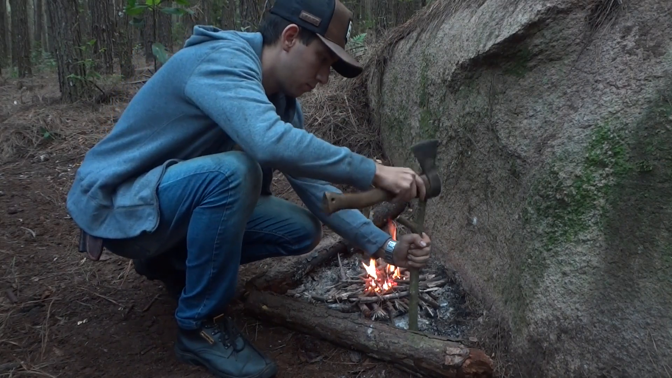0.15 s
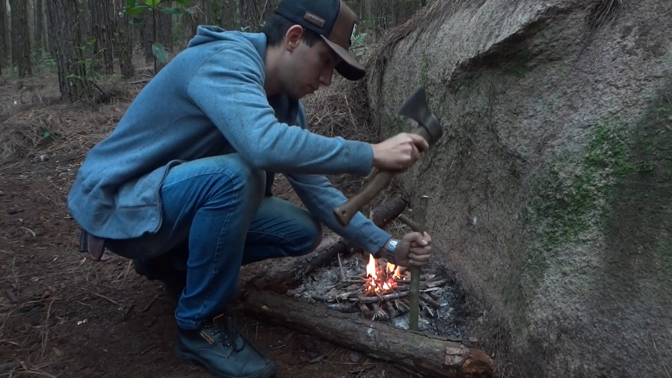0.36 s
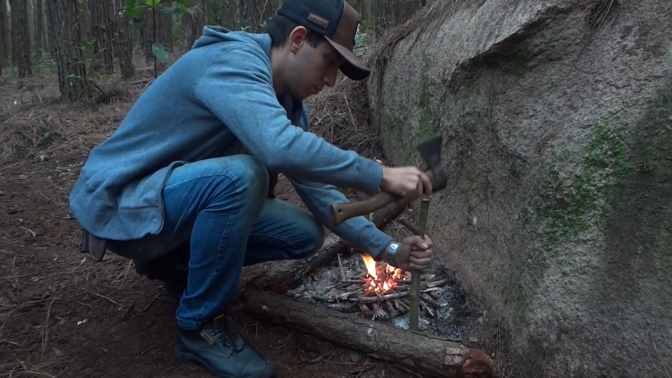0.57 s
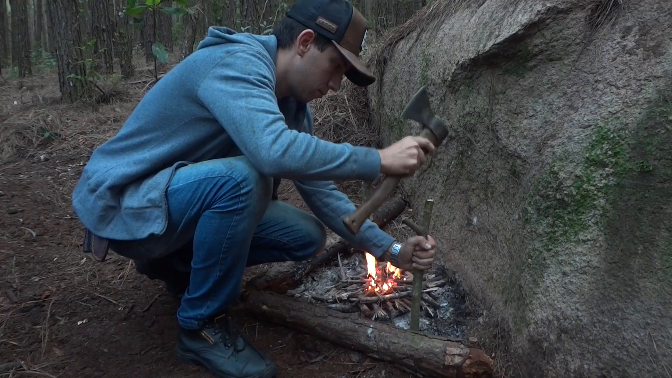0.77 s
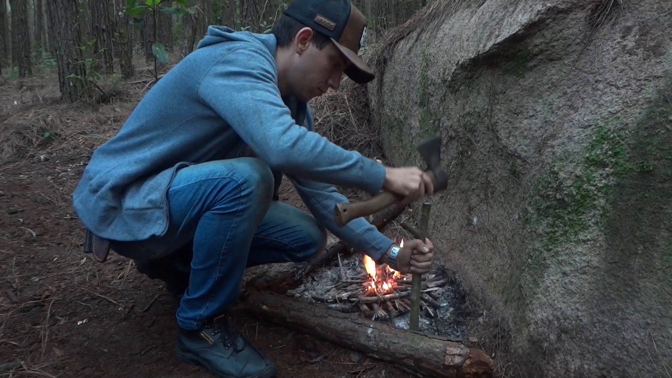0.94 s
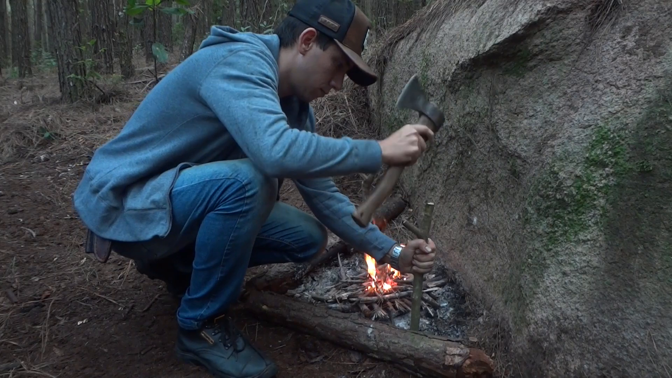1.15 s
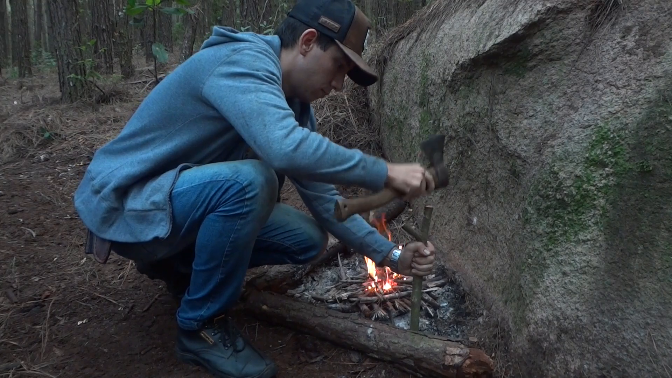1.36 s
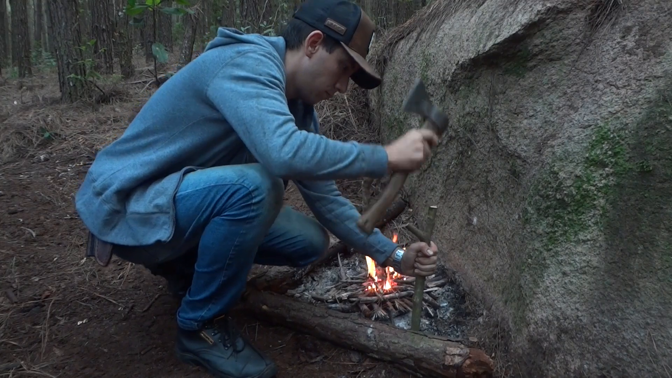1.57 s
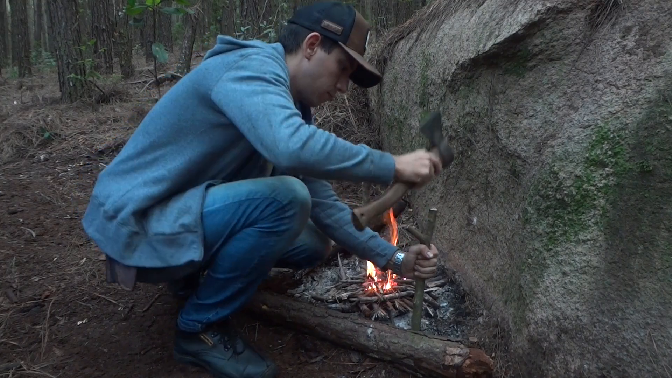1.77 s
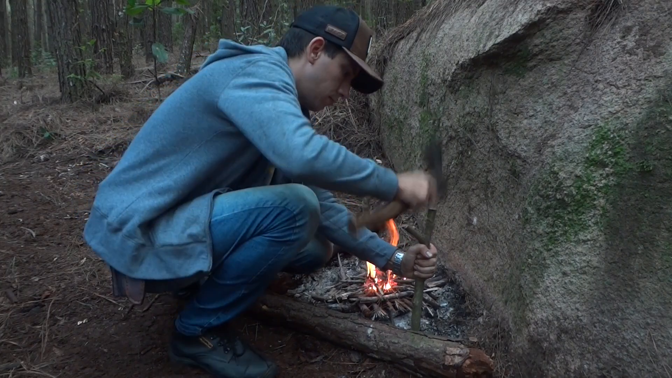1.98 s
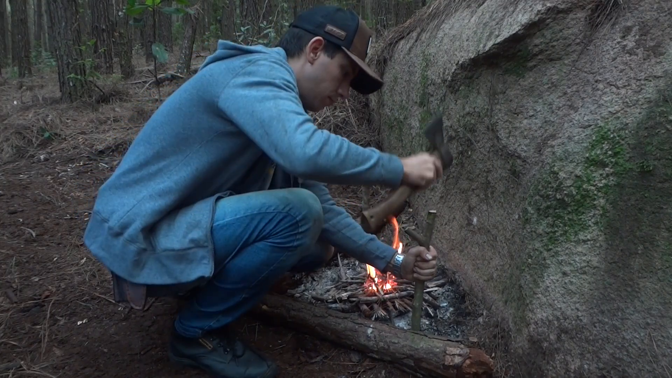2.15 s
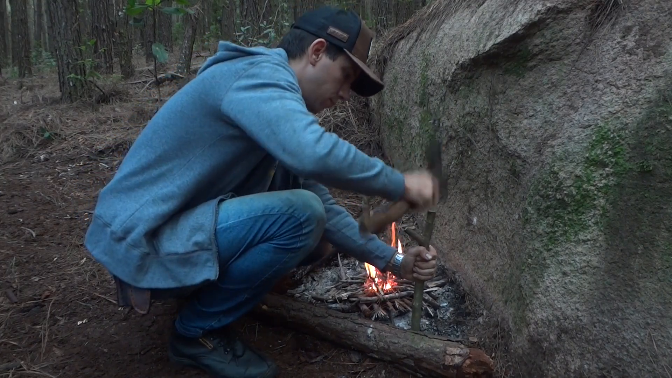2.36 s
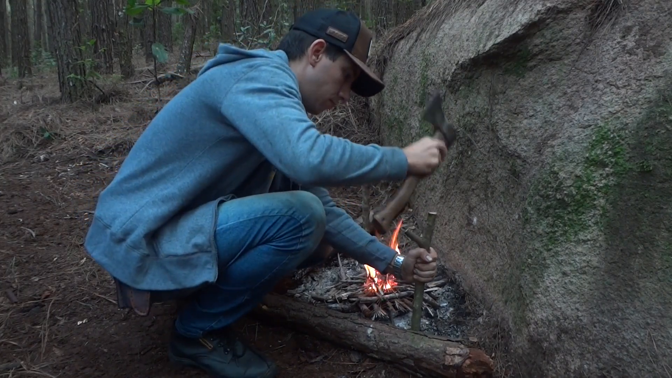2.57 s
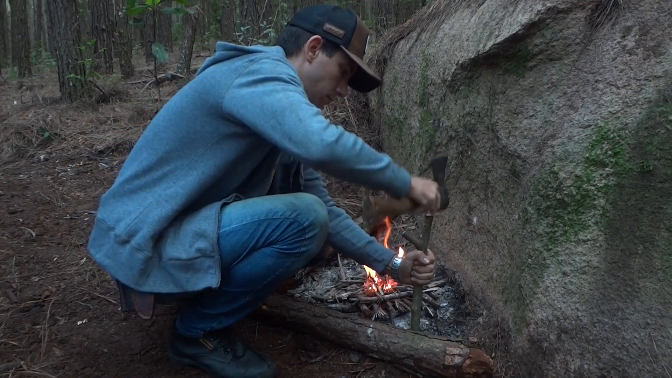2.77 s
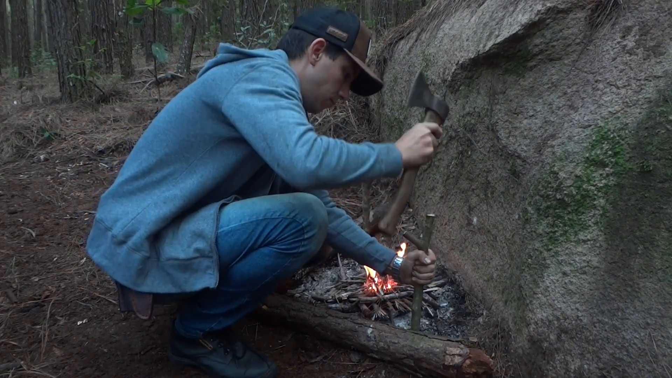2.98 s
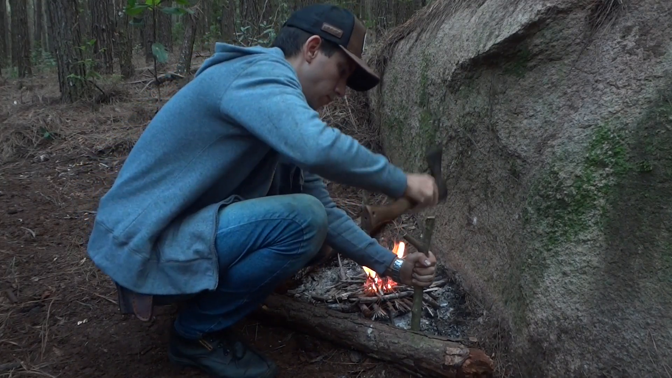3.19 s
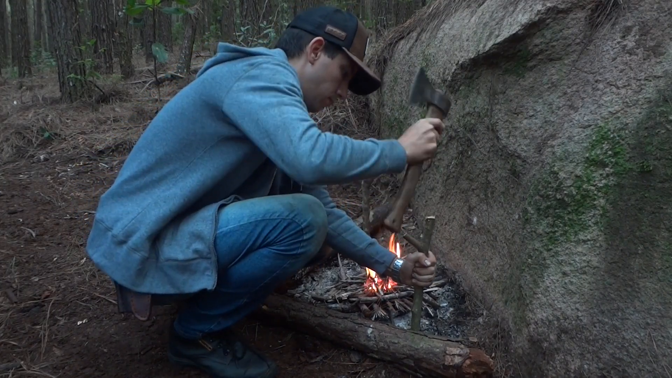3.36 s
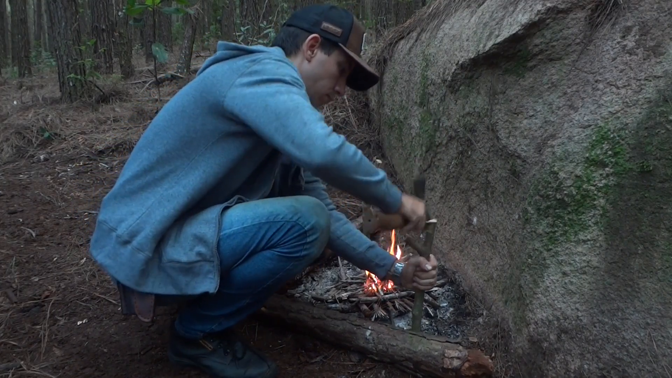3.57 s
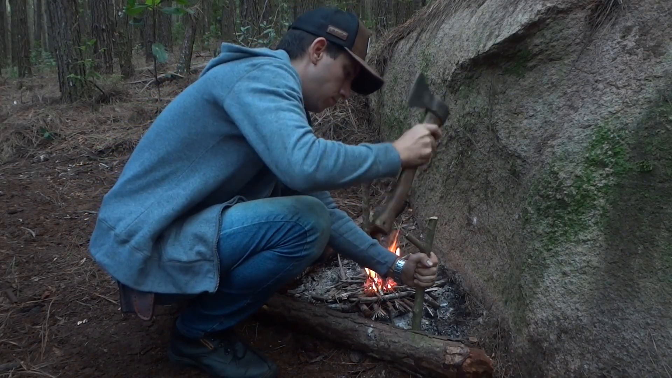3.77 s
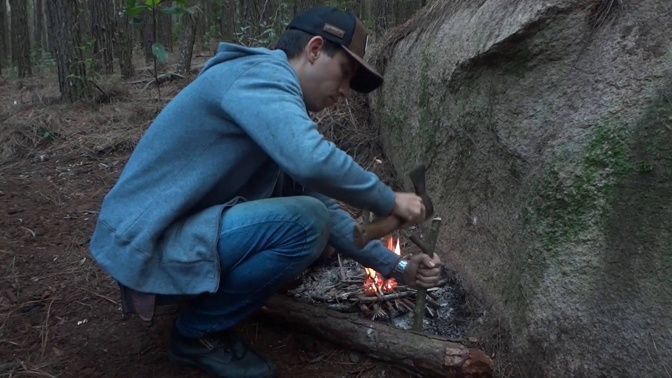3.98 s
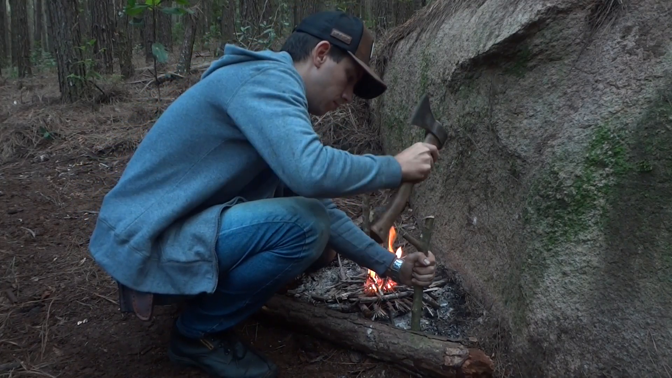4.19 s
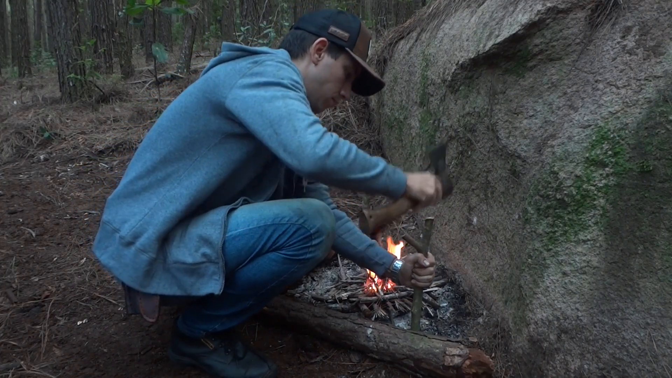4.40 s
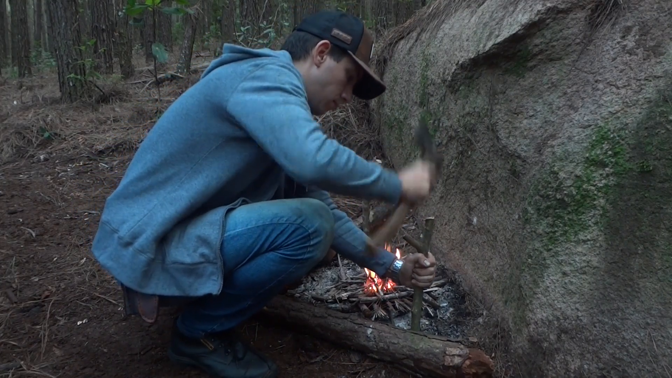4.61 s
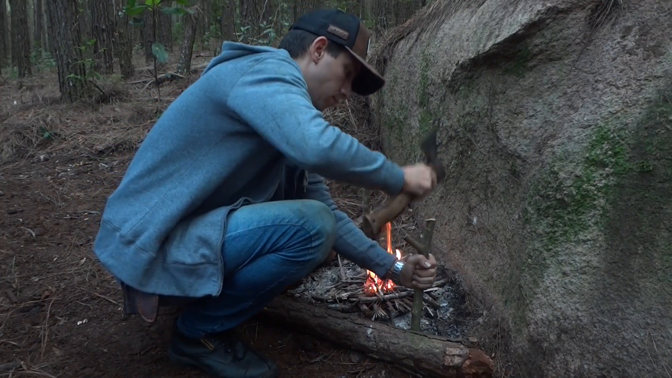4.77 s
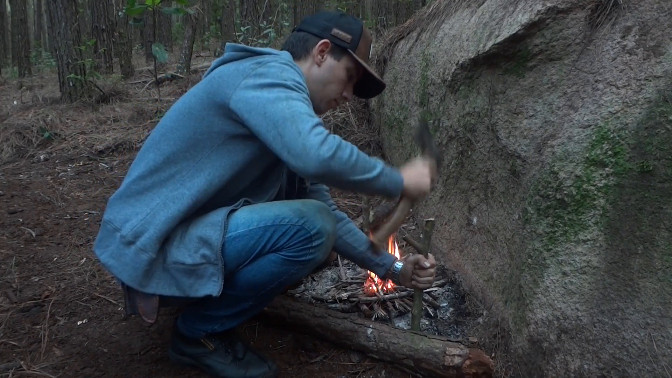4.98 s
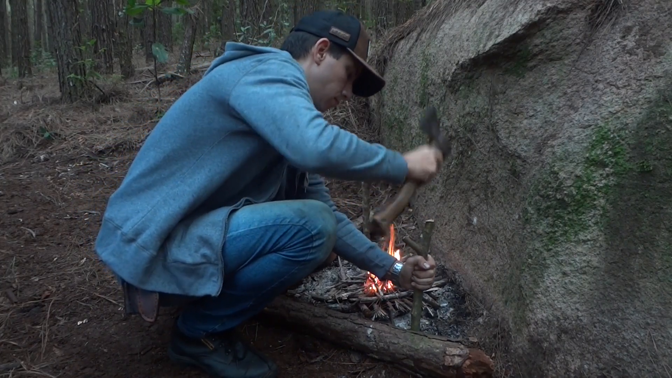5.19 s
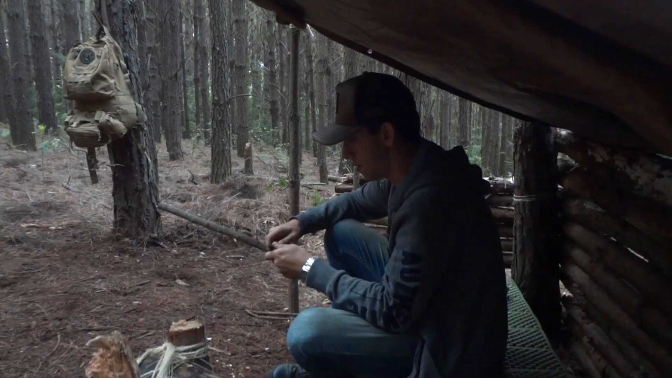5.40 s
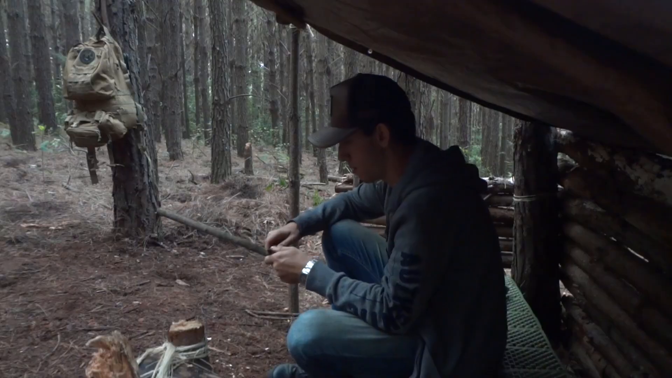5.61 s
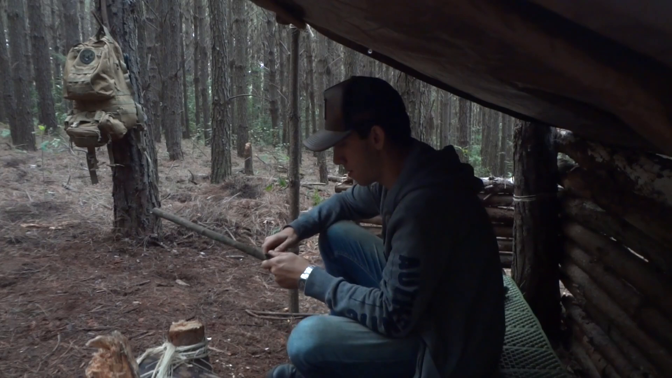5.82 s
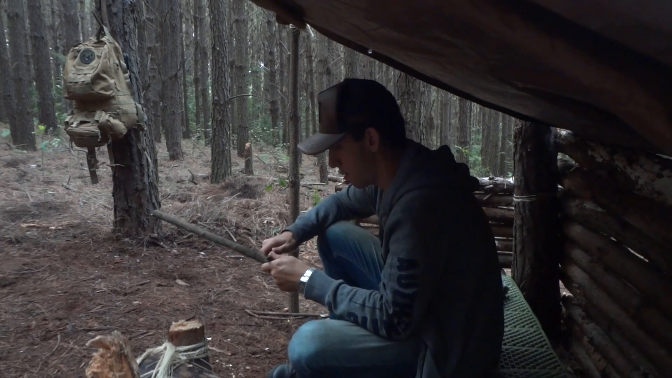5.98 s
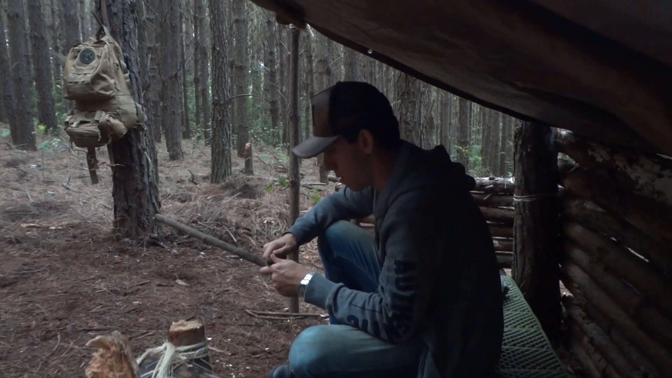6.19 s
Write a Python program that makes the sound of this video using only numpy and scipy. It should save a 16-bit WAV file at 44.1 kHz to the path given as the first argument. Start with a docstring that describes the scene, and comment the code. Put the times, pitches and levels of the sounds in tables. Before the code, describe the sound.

A soft, wide hush of still woods and faint, shrill insects far off run throughout. A small campfire pops quietly at the start. At about 0.2 seconds a hatchet begins driving a wooden stake, close to the stereo microphone and just right of centre. Fourteen blows land evenly, a little under three a second. Each is a woody knock with a short ring of wood and steel and a small grind of grit, echoed briefly by the trunks. Some are dull, others crack sharply. Faint fire pops fall between 1 and 2 seconds. From about 2.4 seconds the blows are louder, with a low ground thump that has grown as the stake seats itself. At 3.5 seconds one blow glances and lands twice with a stony scrape. The last comes near 5.1 seconds. The fire pops again at 5.4, and the insects swell slightly near 5.9.

```python
"""A camp in still woods, the stereo microphone close to a wooden stake, faint insects far off.
A small fire pops, then a hatchet starts on the stake: fourteen quick blows, each a knock, a short ring
and a grind of grit, scattered back by the trunks. Square blows crack and carry further than soft ones.
A thump from the ground grows as the stake seats itself; at 3.5 s one blow glances and lands twice.
After the last blow, near 5 s, the fire pops once more and the insects swell briefly."""
import sys
import numpy as np
from scipy import signal
from scipy.fft import rfft, irfft
from scipy.io import wavfile
from scipy.ndimage import uniform_filter1d, minimum_filter1d

SR = 44100
rng = np.random.default_rng(int(sys.argv[2]) if len(sys.argv) > 2 else 0)


def persist_wave(psi):
    """Save psi, clipped to +-1, as 16-bit WAV."""
    counts = np.round(np.clip(psi, -1, 1) * 32767).astype(np.int16)
    wavfile.write(sys.argv[1], SR, np.atleast_2d(counts).T)


N = 275625
T = np.arange(SR // 2) / SR  # time since an event began, s

# spectra of the still air, mid and side: f/Hz, relative level/dB
AIR_MID_SPECTRUM = [(20, -7), (45, -5), (70, -3.5), (200, -4.5), (400, -3), (750, -0.5), (1200, -3),
                    (2000, -5), (3500, -9), (7000, -11.5), (12000, -13), (16000, -15)]
AIR_SIDE_SPECTRUM = [(20, -23), (70, -13), (200, -2), (400, 5), (750, 8), (1300, 6.5), (2400, 0),
                     (4400, -7.5), (8000, -21.5), (15000, -101)]
# shrill lines of the far insects: f/Hz, relative level/dB
INSECT_LINES = [(4970, -0.5), (5060, -13.5), (5160, -0.5), (5330, 0)]
# their higher chirps: t/s, level/dB, f/Hz
INSECT_CHIRPS = [(4.17, -75, 6700), (5.58, -75, 6800), (5.75, -77, 6860), (6.19, -75, 7300)]
# pops of the camp fire: t/s, level/dB, f/Hz, width/Hz
FIRE_POPS = [(.0690, -57, 1200, 600), (1.1100, -69, 5000, 6000), (1.6620, -63, 4000, 5000),
             (1.9189, -56, 5000, 6000), (5.0140, -66, 5000, 6000), (5.3652, -53, 1150, 450)]
# what the trunks and the nearby rock throw back: f/Hz, relative level/dB
TRUNK_SPECTRUM = [(60, -7), (140, -2), (300, -6), (600, -3), (1000, -5), (1400, -1.5), (1900, 2.5),
                  (3000, -1), (4500, -0.5), (7000, -2), (12000, -14)]
ROCK_SPECTRUM = [(100, 5), (500, 0.5), (1600, 1.5), (2600, -2.5), (4500, -5), (8000, -3.5), (15000, -6)]
# spectrum of grit rubbing on the stake: f/Hz, relative level/dB
GRIT_SPECTRUM = [(300, -10), (1500, -11), (3500, 8.5), (4700, 3.5), (6000, 8.5), (8000, 4), (10000, 1.5),
                 (14000, 1.5), (16000, -7.5)]
# further loud scrapes along the stake, several where it stops just after a blow: t/s, level/dB, length/s
LOUD_SCRAPES = [(0.577, -36, 0.0028), (1.324, -39.5, 0.014), (2.451, -40, 0.002), (2.4973, -53, .003),
                (2.797, -37.5, 0.0022), (3.138, -38.5, 0.0024), (3.535, -31.5, 0.0043),
                (3.555, -36, 0.0076), (5.107, -38, 0.0013)]
# soil giving way under the stake: t/s, level/dB, f/Hz
SOIL_THUDS = [(3.1731, -43, 176), (3.1738, -73, 315), (3.534, -42.5, 347)]
# damped modes of the held stake, low ones knock, high ones crack: f/Hz, width/Hz, relative gain/dB
KNOCK_MODES = [(214, 160, -23), (603, 160, -3), (899, 300, -2), (1192, 380, 1.5)]
CRACK_MODES = [(1866, 116, 11.5), (2006, 310, 8.5), (2424, 370, 10.5), (2980, 230, -20.5), (3335, 680, 10),
               (4330, 660, 7), (5240, 160, -20), (7000, 440, -13), (12550, 2000, -6.5)]
# longer rings: f/Hz, t60/s, level re group/dB, group (0 stake, 1 steel, 2 steel ping, 3 stake ting)
RING_MODES = [(1378, .115, 0, 0), (1425, .05, -11, 0), (1877, .13, 0, 1), (1862, .62, -10, 1),
              (1930, .07, -8, 1), (3480, .22, 0, 2), (3570, .22, -1, 2), (5860, .19, -4, 3),
              (5975, .13, -1, 3)]
# hatchet landings: t/s, strength/dB, sharpness/Hz, thump f/Hz, stake ring/dB, steel ring/dB, ping/dB
HATCHET_BLOWS = [ (0.1802, -35, 1040, 184, -45.5, -60, -61), (0.5603, -31, 970, 182, -52, -59, -63),
                 (0.9298, -30.5, 2140, 163.6, -37.5, -64, -57.5),
                 (1.3091, -32, 730, 165, -50, -53.5, -56.5), (1.6752, -33.5, 6300, 162, -38, -46.5, -54),
                 (2.0471, -32, 4060, 142, -42.5, -49.5, -57.5),
                 (2.415, -25, 4930, 131.4, -30.5, -42, -53.5),
                 (2.7624, -26, 5470, 135.5, -36.5, -43.5, -61), (3.1331, -27, 1330, 131, -60, -53.5, -66),
                 (3.5142, -28, 1610, 156, -69, -56, -62), (3.5304, -37.5, 7000, 162.6, -65, -66, -59),
                 (3.9687, -27.5, 1320, 170.3, -70, -49, -75),
                 (4.3492, -26.5, 4460, 141.5, -42.5, -42, -46.5), (4.7021, -28, 2930, 132.4, -55, -51, -73),
                 (5.0701, -25.5, 4900, 138, -46, -51, -56.5)]


def undb(db):
    """Decibels to gain."""
    return 10 ** (np.asarray(db) / 20)


def level(x, db, span_s):
    """Scale x so that its energy, spread over span_s, has the given rms level."""
    return x * undb(db) / np.sqrt(np.sum(x ** 2) / (span_s * SR) + 1e-18)


def add(track, s, x):
    """Mix x into the track from time s on."""
    i = max(int(s * SR), 0)
    track[..., i:i + x.shape[-1]] += x[..., :track.shape[-1] - i]


def colour(x, spectrum, size=4096):
    """Minimum-phase filter through the given points: f/Hz, gain/dB."""
    hz, db = np.transpose(spectrum)
    bin_hz = np.arange(size // 2 + 1) * SR / size
    gain = undb(np.interp(np.log(bin_hz + 1), np.log(hz), db))
    cepstrum = irfft(np.log(gain))
    cepstrum[1:size // 2] *= 2
    cepstrum[size // 2 + 1:] = 0
    return signal.fftconvolve(x, irfft(np.exp(rfft(cepstrum))))[:len(x)]


def resonate(x, hz, width_hz):
    """Two-pole resonance, gain 1 at the centre."""
    return signal.lfilter(*signal.iirpeak(hz, hz / width_hz, fs=SR), x)


def fade(t60):
    """Exponential decay, 60 dB down after t60 seconds."""
    return np.exp(-np.log(1000) * T / t60)


def rise(time_s):
    """Exponential onset from 0 towards 1."""
    return 1 - np.exp(-T / time_s)


def walk(rate_hz):
    """Smooth random wander with a spread of 1."""
    hold = int(SR / rate_hz)
    steps = np.repeat(rng.standard_normal(N // hold + 1), hold)
    wander = uniform_filter1d(uniform_filter1d(steps, hold), hold)[:N]
    return wander / wander.std()


def air(mid_db=-64, side_db=-62):
    """The soft, wide hush of the woods all round the microphone, under an even hiss."""
    mid = level(colour(rng.standard_normal(N), AIR_MID_SPECTRUM), mid_db, N / SR)
    side = level(colour(rng.standard_normal(N), AIR_SIDE_SPECTRUM), side_db, N / SR)
    return mid + np.array([side, -side])


def insects(base_db=-74.5, swell_db=5, swell_at_s=5.87, swell_s=0.1, waver_hz=60, flutter_db=5.5):
    """Far insects, each a wavering shrill line, with one brief swell and a few higher chirps."""
    swell = np.exp(-((np.arange(N) / SR - swell_at_s) / swell_s) ** 2)
    chorus = np.zeros((2, N))
    for part in chorus:
        for hz, db in INSECT_LINES:
            phase = 2 * np.pi * np.cumsum(hz + waver_hz * walk(180)) / SR
            part += np.sin(phase) * undb(db + flutter_db * walk(90))
    mid, side = (level(part, 0, N / SR) * undb(base_db + swell_db * swell) for part in chorus)
    chirp_shape = np.exp(-((T - .05) / 0.015) ** 2)
    for s, db, hz in INSECT_CHIRPS:
        band = resonate(resonate(rng.standard_normal(len(T)), hz, 300), hz, 300)
        add(mid, s - .05, level(band * chirp_shape, db, 0.029))
    return mid + 0.48 * np.array([side, -side])


def fire():
    """Single pops of burning twigs, dull or sharp, in the centre of the image."""
    out = np.zeros(N)
    click = 1. * (T == 0)
    for s, db, hz, width_hz in FIRE_POPS:
        pop = resonate(resonate(click, hz, width_hz), hz, 2 * width_hz)
        add(out, s, level(pop, db, 0.0039))
    return out


def scatter(x, spectrum, t60, build_s, patchy_db, wide):
    """A fresh cloud of small echoes, partly alike on the two sides of the microphone."""
    echoes = rng.standard_normal((2, len(T))) * undb(patchy_db * rng.standard_normal((2, len(T))))
    echoes *= fade(t60) * rise(build_s)
    responses = (colour(cloud / np.linalg.norm(cloud), spectrum) for cloud in echoes)
    mid, side = (signal.fftconvolve(x, response)[:len(T)] for response in responses)
    return mid + wide * np.array([side, -side])


def trunk_echoes(x):
    """Later echoes from the trunks standing further off, all around."""
    return undb(-20) * scatter(x, TRUNK_SPECTRUM, t60=0.47, build_s=0.0046, patchy_db=5.5, wide=0.49)


def rock_echoes(x):
    """Early scatter from the rough rock and the ground close by."""
    return undb(-10) * scatter(x, ROCK_SPECTRUM, t60=0.094, build_s=0.0007, patchy_db=1.5, wide=0.73)


def from_ground(x, screen_db=-7):
    """A sound at the foot of the stake, half screened from its surroundings."""
    return x + undb(screen_db) * (rock_echoes(x) + trunk_echoes(x))


def grains(envelope, spread_db=4.0, clump_db=3.0, clump_s=0.00081):
    """Dense clicks of soil grains; they stick and slip in clumps."""
    clumps = uniform_filter1d(rng.standard_normal(len(T)), int(clump_s * SR) + 1)
    sizes = undb(spread_db * rng.standard_normal(len(T)) + clump_db * clumps / clumps.std())
    return colour(rng.standard_normal(len(T)) * sizes * envelope, GRIT_SPECTRUM)


def scrape(db, length_s):
    """A stone rubs along the stake: a short burst of grains."""
    return level(grains(np.exp(-(T / length_s) ** 4)), db, length_s)


def slide(grit_db, slide_s=0.037):
    """The stake slides through the soil: grit grinds until it stops, then trickles."""
    grinding = np.exp(-(T / slide_s) ** 6)
    trickle = 1.2 * fade(0.41)
    grit = level(grains(rise(0.002) * (grinding + trickle)), grit_db, .05)
    add(grit, rng.uniform(0, slide_s / 2), scrape(db=-44.5, length_s=0.001))  # catches on a small stone
    add(grit, rng.normal(.0345, .002), scrape(db=-44, length_s=0.0019))  # scrapes where it stops
    return grit


def thump(db, hz, t60=0.08, stiffening=0.55, relax_s=0.0032):
    """Stake and soil bounce together; the soil is stiffest while squeezed, and loose earth rumbles."""
    phase = 2 * np.pi * np.cumsum(hz * (1 + stiffening * np.exp(-T / relax_s))) / SR
    bounce = np.sin(phase) * fade(t60) + 0.12 * np.sin(1.65 * phase) * fade(0.11)
    earth_band = signal.butter(2, [0.6 * hz, 1.16 * hz], "band", fs=SR)
    earth = signal.lfilter(*earth_band, rng.standard_normal(len(T)))
    motion = (bounce + 0.51 * earth / earth.std() * fade(0.08)) * rise(0.0018)
    # a small patch of ground radiates no deep bass
    radiated = signal.lfilter(*signal.butter(2, 75, "high", fs=SR), motion)
    return level(radiated, db, 0.037)


def contact(sharp_hz, crush_s, push):
    """Force of the steel on the stake: a push amid crushing fibres; a soft landing rounds it off."""
    pressing = np.exp(-(T / crush_s) ** 4) * rise(0.00048)
    force = rng.standard_normal(len(T)) * pressing
    force /= np.linalg.norm(force)
    force[int(.0008 * SR)] += push
    # countless fibres break, so the force favours no pitch
    flat = irfft(np.exp(1j * np.angle(rfft(force))), len(T))
    return signal.lfilter(*signal.butter(1, sharp_hz, fs=SR), flat * np.sqrt(pressing))


def struck_wood(force, modes, slap, slap_s):
    """Damped wood modes; the rock face and the ground beside the stake slap them straight back."""
    direct = sum(undb(db) * resonate(force, hz, width_hz) for hz, width_hz, db in modes)
    delay_s = slap_s * rng.uniform(0.836, 1.202)
    return direct + slap * np.interp(T - delay_s, T, direct, left=0)


def ring(group_db, detune=0.0033):
    """Stake and hatchet ring on; where the blow lands decides how strongly each group sounds."""
    tone = 0
    for hz, t60, db, group in RING_MODES:
        mode_hz = hz * (1 + detune * rng.standard_normal())
        mode = np.sin(2 * np.pi * mode_hz * T) * fade(t60) * rise(0.0026)
        tone = tone + level(mode, db + group_db[round(group)], .05)
    return tone


def hatchet(pan_db=-1.5, seating_s=1.34, grip_at_s=1.8, gripping_s=0.24):
    """Steel drives the stake, close by and just right of centre: knock, crack, ring, thump and grit."""
    out = np.zeros((2, N))
    pan = undb(np.array([[pan_db], [-pan_db]]) / 2)
    for s, db, sharp_hz, thump_hz, stake_db, steel_db, ping_db in HATCHET_BLOWS:
        hardness = np.log2(sharp_hz / 3000)  # octaves sharper than the usual blow
        effort_db = db + 28  # strength over the usual -28 dB
        looseness = np.exp(-s / seating_s)  # the stake starts loose and seats itself
        # a sharper blow knocks less, cracks more and sends more into the trees
        knock_force = contact(sharp_hz, crush_s=0.0053, push=0.73)
        knock = struck_wood(knock_force, KNOCK_MODES, slap=0.23, slap_s=0.002066)
        crack_force = contact(sharp_hz, crush_s=0.0031, push=0.14)
        crack = struck_wood(crack_force, CRACK_MODES, slap=0.49, slap_s=0.001162)
        impact = level(knock, db - 1.13 * hardness, .008) + level(crack, db + 2.64 * hardness, .008)
        # the stake tings thinly until the soil grips it
        grip_db = 20 * np.log10(1 + np.exp((s - grip_at_s) / gripping_s))
        ting_db = -52.5 + effort_db - grip_db
        tone = ring([stake_db, steel_db, ping_db, ting_db])
        echo = undb(3.5 - 4 * looseness + 3.5 * hardness) * trunk_echoes(impact + 0.84 * tone)
        add(out, s, pan * (impact + tone) + rock_echoes(impact + 0.5 * tone) + echo)
        # the thump is fullest with the stake seated and the pitch low
        thump_db = -34 - 35 * looseness - 0.4 * effort_db - 9 * np.log2(thump_hz / 135)
        grit_db = -50 + looseness - 0.14 * hardness  # a soft blow grinds a little more grit
        add(out, s, from_ground(thump(thump_db, thump_hz) + slide(grit_db)))
    for s, db, length_s in LOUD_SCRAPES:
        add(out, s, from_ground(scrape(db, length_s)))
    for s, db, hz in SOIL_THUDS:
        add(out, s, from_ground(thump(db, hz, t60=0.066)))
    return out


def scene():
    """The camp as it reaches the microphone."""
    return hatchet() + fire() + insects() + air()


def record(dry, bass_hz=58, ceiling_db=-14.5, hold_s=0.0014, top_hz=16100):
    """The recorder thins the deep bass, turns down briefly around loud peaks and cuts the top."""
    thin = signal.sosfilt(signal.butter(3, bass_hz, "high", fs=SR, output="sos"), dry)
    hold = int(hold_s * SR) + 1
    gain = np.minimum(1, undb(ceiling_db) / (np.abs(thin).max(axis=0) + 1e-9))
    limited = thin * uniform_filter1d(minimum_filter1d(gain, hold), hold)
    return signal.sosfilt(signal.ellip(10, .2, 70, top_hz, fs=SR, output="sos"), limited)


dry = scene()
out = record(dry)
persist_wave(out)
```